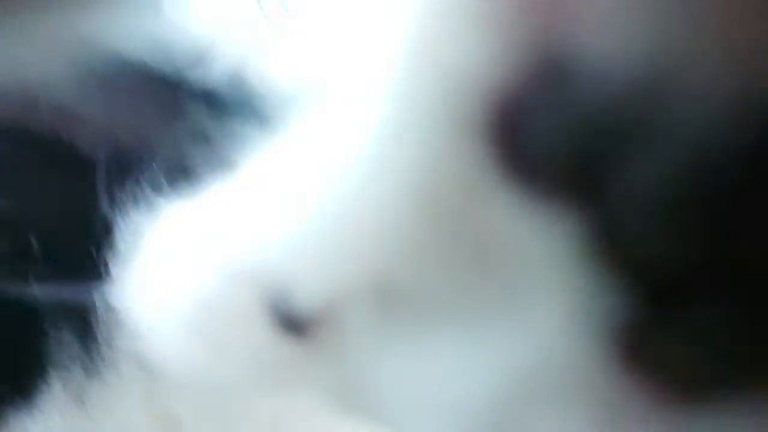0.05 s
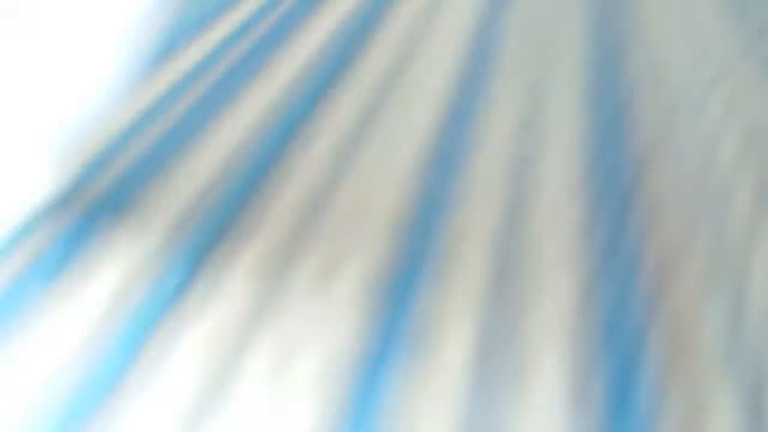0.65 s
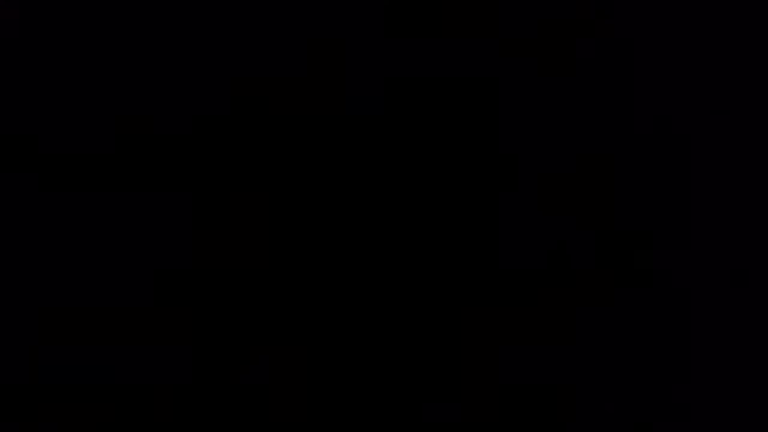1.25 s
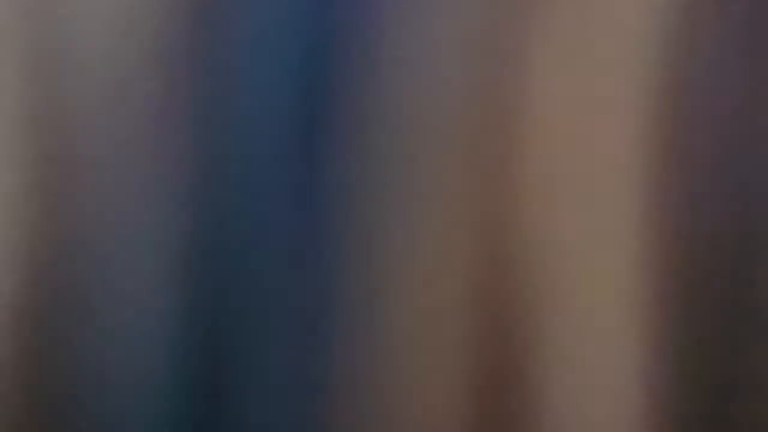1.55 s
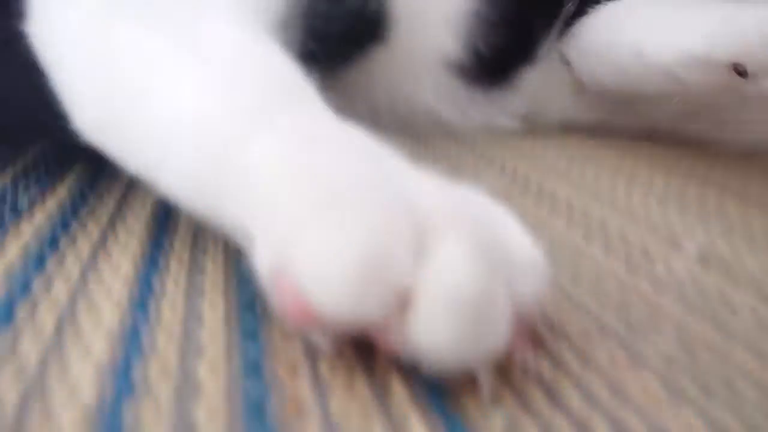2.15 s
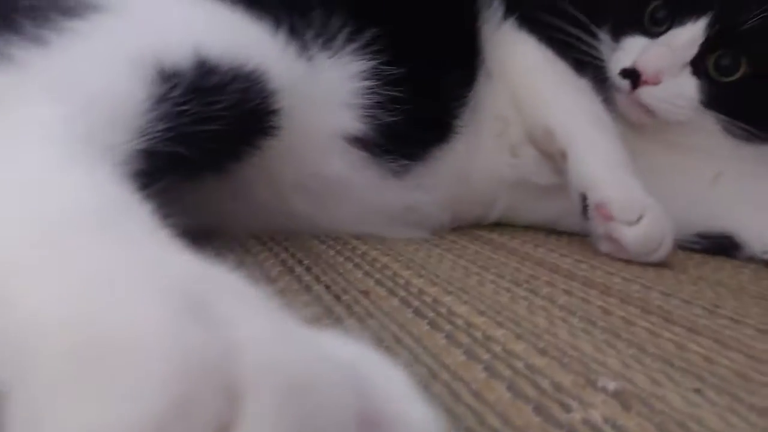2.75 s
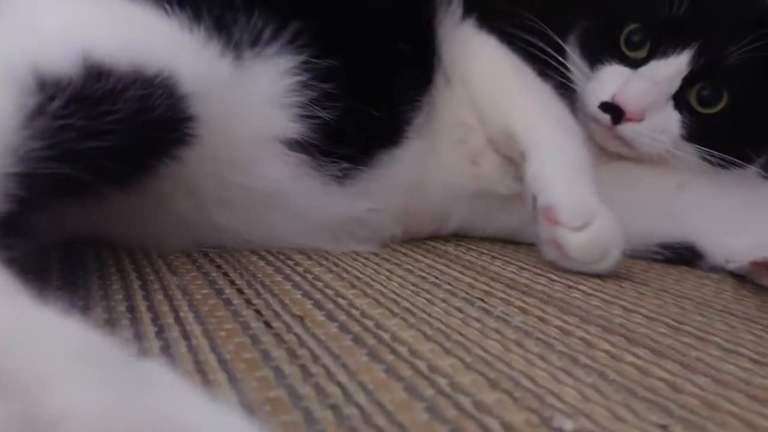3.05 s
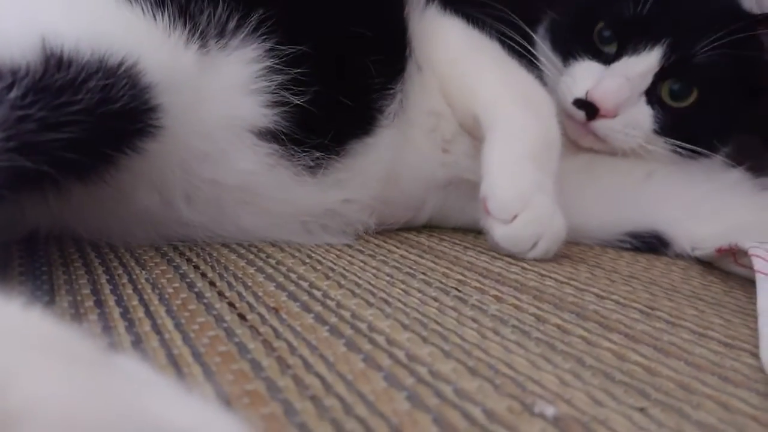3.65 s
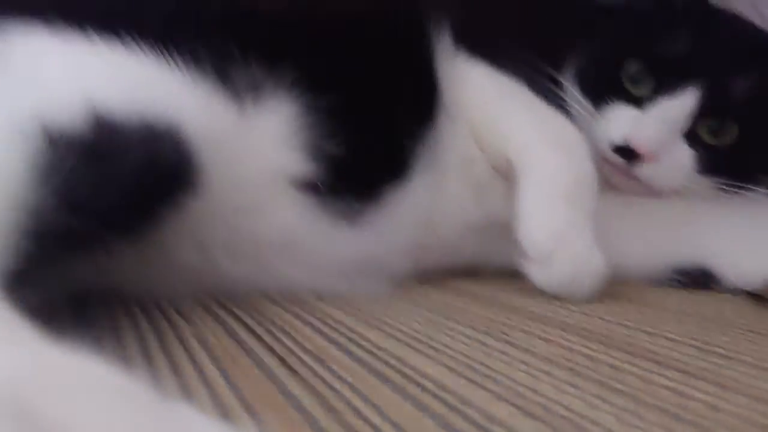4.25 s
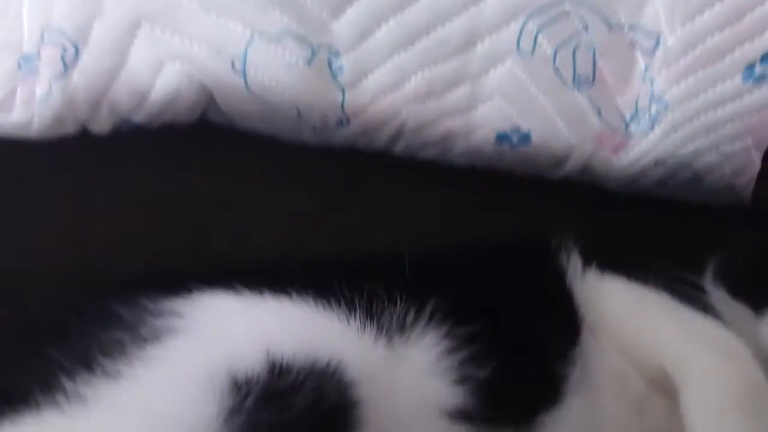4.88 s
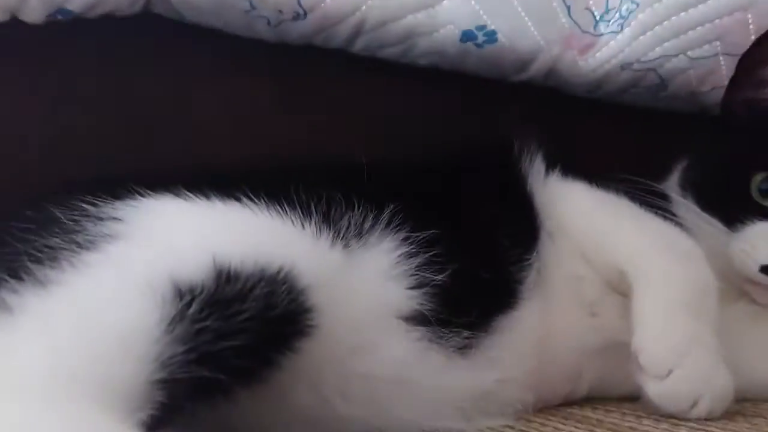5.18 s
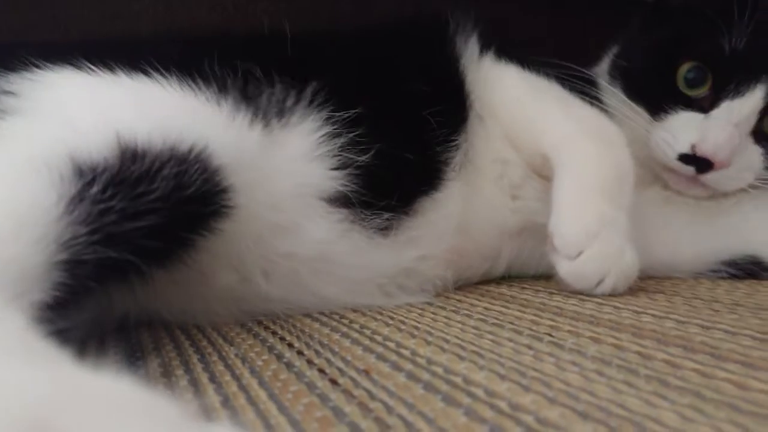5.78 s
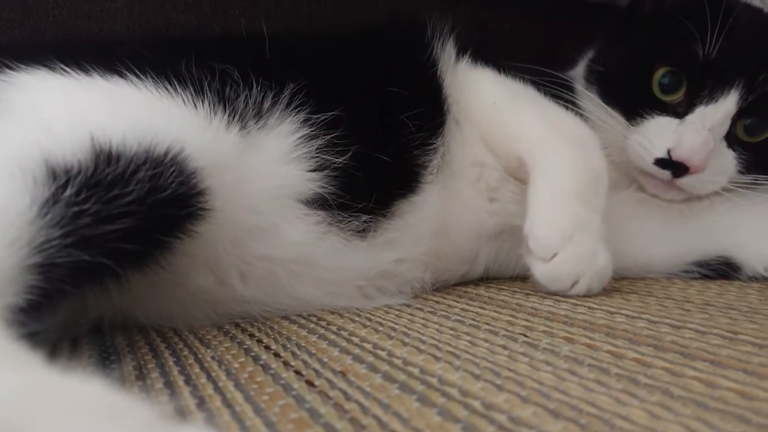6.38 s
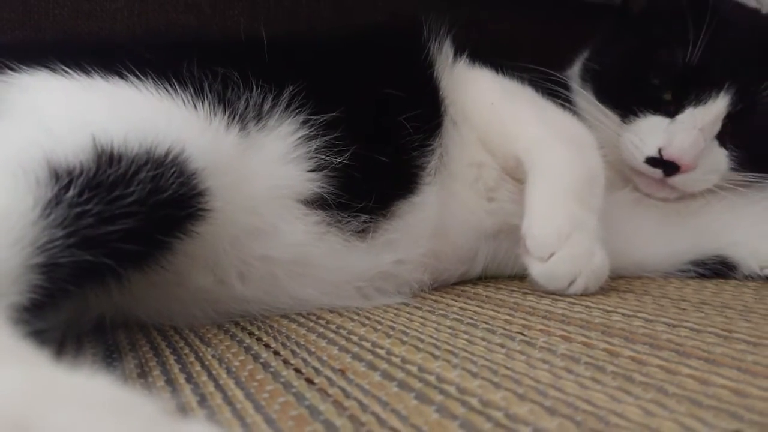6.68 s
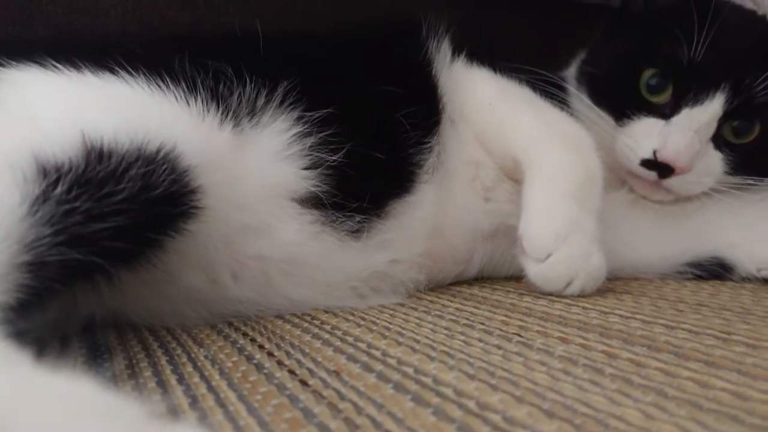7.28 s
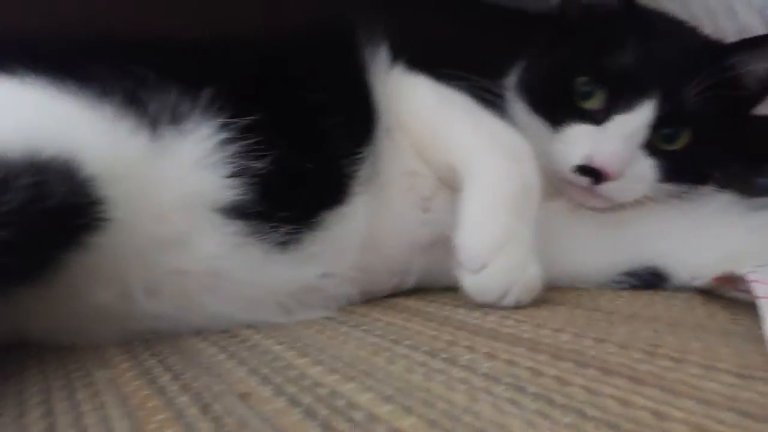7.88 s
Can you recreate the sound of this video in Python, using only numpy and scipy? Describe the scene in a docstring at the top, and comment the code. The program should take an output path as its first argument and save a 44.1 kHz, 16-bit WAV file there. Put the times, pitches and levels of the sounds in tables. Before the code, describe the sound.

Close fur rustling, scuffs and sharp clicks on a hand-held phone, thinning to occasional finger slides and dull taps over quiet room tone.

```python
"""A hand-held phone is pushed along a cat's fur, then held beside the cat in a quiet room.
At first, hairs and fingers stick and slip over its two microphone ports, each hearing its own rustle,
while the case is knocked, scuffed and bumped. After three seconds the rubbing sinks and single hairs
tick past. A second flurry of knocks and hollow finger slides comes between four and six seconds.
Then only the grip shifts now and then over the room tone, ending in a cluster of dull taps."""
import sys
import numpy as np
from scipy import signal
from scipy.fft import rfft, irfft
from scipy.io import wavfile
from scipy.ndimage import uniform_filter1d

SR = 44100
rng = np.random.default_rng(int(sys.argv[2]) if len(sys.argv) > 2 else 0)


def unload_audio(sound):
    """Save the sound as a 16-bit wav file, at the path given as the first command line argument."""
    columns = np.transpose(np.atleast_2d(sound))
    # keep every value between -1 and 1, then stretch to whole-number steps
    steps = np.round(np.clip(columns, -1, 1) * 32767)
    wavfile.write(sys.argv[1], SR, steps.astype(np.int16))


N = 349438
TIME = np.arange(N) / SR
BLOW_S = .008  # the level of a knock or tap is its rms over this time

# The bed of room tone and microphone hiss at each port. Each row: frequency in Hz, relative level in dB.
ROOM_TONE_LEFT = [(20, -24.5), (70, 4.5), (330, -3.5), (620, 4.5), (900, -7), (1150, -4.5), (1800, -26),
                  (4000, -41.5), (8500, -53), (10500, -24), (16000, -34)]
ROOM_TONE_RIGHT = [(20, -21), (70, 2.5), (200, 6.5), (500, -8), (950, -19.5), (1500, -29.5), (4000, -35),
                   (8800, -65.5), (10500, -34), (16000, -27.5)]
# Level of that bed in dB: left, then right.
ROOM_LEVEL_DB = [-56.5, -58]
# How the case and each port colour a touch. Each row: frequency in Hz, gain in dB.
PORT_COLOUR_LEFT = [(100, -6.5), (280, 5), (620, 4.5), (950, 1.5), (1600, 3), (2500, -2), (3900, -6),
                    (6400, -16.5), (7700, -38.5), (9100, -38), (10000, -23.5), (16000, -31.5)]
PORT_COLOUR_RIGHT = [(100, 0.5), (280, 2), (500, -2), (1200, 1), (2000, -4), (4000, -8), (6000, -9),
                     (8200, -19.5), (9100, -24.5), (10400, -11.5), (16000, -22.5)]
# The low pressure rumble of handling. Each row: frequency in Hz, gain in dB.
RUMBLE_COLOUR = [(20, -36), (48, 1), (72, 0), (150, -7.5), (250, -18.5), (600, -30.5), (2000, -71.5)]
# How the case answers a soft fingertip. Each row: frequency in Hz, gain in dB.
TAP_COLOUR = [(40, -2.5), (130, 5), (300, 0), (550, -8), (850, -28), (2000, -50)]
# Dull finger taps as the grip changes. Each row: start in seconds, left and right level in dB.
FINGER_TAPS = [(2.3322, -44, -32.5), (4.244, -41, -49), (4.385, -42, -48.5), (6.8892, -53, -42),
               (7.6617, -46.5, -39.5), (7.7396, -39, -35.5), (7.76, -41, -33), (7.824, -38.5, -33.5),
               (7.855, -41, -35.5)]
# Soft bumps that press air into the ports. Each row: middle and half-length in seconds,
# left and right level in dB.
AIR_BUMPS = [(0.273, 0.051, -44, -36.5), (0.746, 0.05, -47, -30.5), (0.8, 0.053, -23, -52),
             (1.115, 0.02, -14, -18), (1.189, 0.041, -31, -27.5), (1.258, 0.04, -34, -37),
             (1.577, 0.035, -47, -24.5), (3.183, 0.022, -36, -43), (3.241, 0.013, -33.5, -48),
             (4.285, 0.013, -34.5, -38.5), (4.431, 0.029, -42, -45), (4.56, 0.016, -35, -37)]
# Single hairs flicking past a port. Each row: start in seconds, level before trim in dB,
# left minus right in dB.
HAIR_FLICKS = [(1.2373, -39.5, 8), (1.3073, -52, 1), (1.337, -51, -5), (2.209, -45, 10), (3.738, -48, -1),
               (3.81, -46, 1), (3.877, -51, -2), (3.9149, -44, 0), (3.945, -53.5, 0.5), (4.06, -59.5, 2),
               (4.128, -56, 1), (4.2415, -51.5, 2), (4.275, -53, 2), (4.3653, -50.5, 1.5),
               (4.413, -46.5, -9), (7.209, -42, -2), (7.352, -55, -13)]
# Short scuffs across the ports. Each row: middle and half-length in seconds, left and right level in dB,
# ring in Hz, brightness in dB per octave.
PORT_SCUFFS = [(0.175, 0.013, -31.5, -57, 1010, 0), (0.194, 0.017, -25, -45, 1120, 1.5),
               (0.219, 0.02, -36.5, -51, 1130, -6), (0.251, 0.018, -35.5, -54, 630, -3.5),
               (0.417, 0.012, -33.5, -47, 2850, 5.5), (0.734, 0.01, -32.5, -55, 490, -3),
               (0.812, 0.025, -35.5, -27.5, 295, 1), (0.907, 0.013, -40, -21.5, 497, -0.5),
               (1.091, 0.0024, -32, -32, 12100, 5.5), (1.109, 0.01, -17.5, -44, 300, -1),
               (1.169, 0.01, -45, -29, 704, -1.5), (1.184, 0.0087, -31.5, -34.5, 600, 0.5),
               (1.235, 0.013, -40, -31.5, 477, -3), (1.264, 0.013, -40.5, -32, 670, -5),
               (1.399, 0.014, -37, -33, 420, -1), (1.421, 0.026, -29.5, -31, 720, -0.5),
               (1.613, 0.02, -47, -31, 3030, -2), (2.078, 0.012, -39.5, -56, 2700, 0.5),
               (2.232, 0.011, -42, -56, 2700, 4), (2.387, 0.016, -44, -56, 2600, 0.5),
               (2.467, 0.014, -45, -59, 2510, 0), (2.531, 0.019, -41, -61, 2800, 0.5),
               (3.1, 0.018, -38, -65, 5600, 5), (4.549, 0.021, -36.5, -34, 570, -2),
               (4.86, 0.023, -45.5, -54, 1390, 0), (5.323, 0.018, -43, -45, 1900, 3),
               (7.907, 0.0083, -40.5, -37.5, 560, 1)]
# Longer strokes of a finger or the coat. Each row: start and end in seconds, left and right level in dB,
# first and last ring in Hz, ring boost in dB, brightness in dB per octave, swell in dB.
SLIDING_STROKES = [(0.418, 0.665, -49, -64, 760, 620, 18, -4, -6),
                   (0.41, 0.611, -44.5, -72, 2870, 3050, 18, 5, -1),
                   (0.735, 0.856, -55, -42, 6000, 4800, 2, 2.5, -2),
                   (2.137, 2.267, -55, -67, 1800, 1850, 28, 6, 16),
                   (2.275, 2.341, -43, -58, 2500, 3700, 13, 2, 5),
                   (2.299, 2.736, -56, -66.5, 417, 475, 5, -6.5, 23),
                   (3.061, 3.189, -39.5, -85, 4460, 3800, 0.5, 8.5, 4),
                   (3.56, 3.732, -64, -68, 3750, 3950, 15, 4, 2),
                   (4.417, 4.478, -56, -48, 1300, 1800, 5, 3.5, 12),
                   (4.721, 4.807, -73, -51.5, 10880, 11500, 8, 1, -4),
                   (5.199, 5.366, -45.5, -47, 1150, 1800, 9, 2, 4),
                   (5.5, 5.59, -44, -46.5, 1300, 1800, 12, 3, 10),
                   (5.571, 5.656, -46.5, -49, 1300, 910, 15, 1.5, -18),
                   (5.813, 5.916, -52.5, -53.5, 1070, 1300, 12, -2, -17),
                   (5.878, 6.071, -53, -54, 1120, 1490, 11, 1.5, 19),
                   (6.856, 6.943, -57.5, -42, 2000, 3100, 8, 0.5, 24),
                   (7.099, 7.131, -62, -43.5, 1300, 1700, 5.5, 0, 7),
                   (7.155, 7.25, -57, -40.5, 1100, 2600, 6.5, 1, -30),
                   (7.68, 7.8, -56, -66, 3700, 3950, 18, 2.5, 0)]
# Sharp knocks on the case. Each row: start in seconds, left and right level in dB, ring in Hz,
# ring boost in dB, brightness in dB per octave, thud against the click in dB.
CASE_KNOCKS = [(0.0702, -27, -49, 1570, 9, 2.5, -36), (0.2303, -29.5, -70, 1180, 14.5, 4, -17),
               (0.2402, -25.5, -40, 1360, 13.5, -1, -31), (0.3697, -11.5, -19.5, 490, 7.5, 0.3, -16.5),
               (0.6726, -31.5, -30, 10600, 23, 0.5, -30), (0.673, -11.5, -20, 2450, 8, -2, -16),
               (0.806, -24, -40, 450, 1, -3.5, -8), (1.107, -13, -37, 1220, 17.5, 4, -3),
               (1.109, -24, -52, 12500, 15, 1.5, -20), (1.115, -45, -22, 770, 16, -1.5, -3),
               (1.1265, -50, -30, 3000, 16, -1.5, -3), (1.1807, -33.5, -48, 14200, 13, 7, -12),
               (1.2281, -44, -29.5, 493, 12.5, -3, -11), (1.2625, -35, -60, 680, 13.5, 0, -18),
               (1.607, -33.5, -36, 3200, 19, -2.5, -22), (1.816, -39, -30, 1430, 12.5, -1, -35),
               (1.846, -42, -36, 492, 1, -3, -27), (2.1294, -37.5, -20, 1690, 7, -1.5, -7.5),
               (4.4712, -36, -27, 940, 14, -5, -8), (4.4954, -22.5, -25.5, 1050, 11, -2, -13),
               (4.5553, -34, -50, 12300, 4, 13, -13), (5.1426, -42, -51, 2420, 16, 1, -16),
               (5.4928, -38, -49, 1246, 4.5, 0, -11.5), (6.744, -51, -55, 690, 10.5, 1.5, -12.5),
               (7.1551, -46, -42.5, 680, 9, -2, -0.5), (7.8612, -56, -31, 3240, 14, 0.5, -2),
               (7.8992, -53, -33.5, 584, 14, -10, -5)]
# Passes of the coat or a finger over the ports. Each row: start and length in seconds, left and right
# level at mid-pass in dB, hair hiss against the drag before trim in dB, swell in dB.
RUB_PASSES = [(0.0, 0.02, -48.5, -60, 3, 2), (0.165, 0.17, -53, -60.5, -1.5, -5),
              (0.374, 0.18, -47, -55, 4.5, -3.5), (0.577, 0.083, -54.5, -62.5, 4.5, 0),
              (0.703, 0.11, -42.5, -51, 0.5, 0.5), (0.841, 0.16, -51, -45.5, 3.5, -1),
              (1.051, 0.035, -42.5, -43.5, -3, 4), (1.105, 0.26, -51.5, -58, -4.5, -4.5),
              (1.409, 0.13, -52, -54.5, 0, -10), (1.577, 0.13, -56.5, -44, -1.5, -9),
              (1.734, 0.078, -43.5, -47, 1, -0.5), (1.843, 0.32, -48, -52.5, 1, -1),
              (2.094, 0.33, -50.5, -55, -1, -8), (2.47, 0.225, -47.5, -61, -3.5, 0.5),
              (2.729, 0.15, -66.5, -67.5, -6.5, 1), (2.892, 0.25, -46, -64.5, 0.5, 4.5),
              (3.239, 0.071, -58.5, -74.5, 1, -7), (3.556, 0.285, -63, -61.5, 0, 6.5),
              (3.903, 0.13, -67, -65.5, -4.5, -4), (4.14, 0.15, -64.5, -68, -3, 6),
              (4.464, 0.083, -47.5, -42.5, 0.5, 3.5), (4.601, 0.1, -44, -46, -1, 3.5),
              (4.725, 0.16, -51.5, -56, -3, -1.5), (4.925, 0.36, -51, -66.5, -5.5, 4),
              (5.216, 0.15, -53, -57, -9, 7.5), (5.52, 0.12, -56.5, -58.5, -12, 2.5),
              (6.53, 0.42, -69.5, -67.5, 1.5, 8.5), (6.962, 0.64, -67.5, -63, 0, 2.5),
              (7.687, 0.18, -55, -56.5, -2, -7)]
# Faint rubbing of the resting hand in dB: left, then right.
RESTING_GRIP_DB = [-76.5, -80]


def undb(db):
    """Decibels to gain."""
    return 10 ** (np.asarray(db) / 20)


def unit(x):
    """Scale to an rms of one."""
    return x / np.sqrt(np.mean(x ** 2))


def curve(points, hz):
    """Read a (Hz, dB) spectrum on a log-frequency axis."""
    f, db = np.transpose(points)
    return np.interp(np.log(hz), np.log(f), db)


def colour(x, db_at, size=4096):
    """Causal EQ with the gain db_at(Hz), built from its cepstrum."""
    hz = np.maximum(np.arange(size // 2 + 1) * SR / size, 1)
    cepstrum = irfft(np.log(undb(db_at(hz))))
    cepstrum[1:size // 2] *= 2
    cepstrum[size // 2 + 1:] = 0
    return signal.fftconvolve(x, irfft(np.exp(rfft(cepstrum))))


def walk(rate_hz):
    """A wandering modulator: random levels, held and smoothed twice, with an rms of one."""
    hold = int(SR / rate_hz)
    held = np.repeat(rng.standard_normal(N // hold + 1), hold)
    return unit(uniform_filter1d(uniform_filter1d(held, hold), hold)[:N])


def slips(n, rate_hz, spread_db, smooth):
    """Tiny stick-slip releases of uneven size over a share of smooth friction noise."""
    sizes = rng.choice([-1, 1], n) * undb(spread_db * np.clip(rng.standard_normal(n), -2, 2))
    releases = sizes * (rng.random(n) < rate_hz / SR)
    return unit(unit(releases + 1e-9) + smooth * rng.standard_normal(n))


def add(track, start, x):
    """Mix x into the track from a start time on."""
    i = max(int(start * SR), 0)
    track[i:i + len(x)] += x[:max(N - i, 0)]


def touch(force, port, ring_hz, tilt_db, ring_db, ring_octaves):
    """One contact heard through a port, at unit energy: the gap under the finger rings."""
    def gain_db(hz):
        octaves = np.log2(np.maximum(hz, 200) / ring_hz)
        resonance_db = ring_db / (1 + (octaves / ring_octaves) ** 2)
        bass_cut_db = -10 * np.log10(1 + (60 / hz) ** 2)
        return curve(port, hz) + tilt_db * octaves + resonance_db + bass_cut_db
    x = colour(force, gain_db)
    return x / np.sqrt(np.sum(x ** 2))


def room(shared=0.77):
    """A steady bed of room tone and hiss, partly common to both ports."""
    common = rng.standard_normal(N)
    bed = []
    for spectrum, db in zip((ROOM_TONE_LEFT, ROOM_TONE_RIGHT), ROOM_LEVEL_DB):
        noise = shared * common + rng.standard_normal(N)
        tone = colour(noise, lambda hz: curve(spectrum, hz))[:N]
        bed.append(unit(tone) * undb(db))
    return np.array(bed)


def taps(channel):
    """A fingertip lands on the case: one dull swing, a little higher or lower each time."""
    out = np.zeros(N)
    for start, *port_db in FINGER_TAPS:
        pitch = rng.uniform(0.87, 1.38)
        swing = colour(np.ones(1), lambda hz: curve(TAP_COLOUR, hz / pitch))
        add(out, start, swing * undb(port_db[channel]) * np.sqrt(BLOW_S * SR / np.sum(swing ** 2)))
    return out


def bumps(channel, lead_s=.004):
    """Soft pushes of air into a port: a few slow swings of pressure each."""
    out = np.zeros(N)
    for middle, half_s, *port_db in AIR_BUMPS:
        n = int(2 * half_s * SR)
        puff = rng.standard_normal(SR // 2)[:n] * np.hanning(n)
        push = colour(puff, lambda hz: curve(RUMBLE_COLOUR, hz))
        gain = undb(port_db[channel]) * np.sqrt(n / 2 / np.sum(push ** 2))
        add(out, middle - half_s - lead_s, gain * push)
    return out


def flicks(port, channel, trim_db=-1, decay_s=0.003):
    """A hair slips free: a thin tick of tiny slips that die at once, each hair with its own ring."""
    out, t = np.zeros(N), TIME[:SR // 32]
    for start, db, pan_db in HAIR_FLICKS:
        force = slips(len(t), rate_hz=2400, spread_db=1.2, smooth=0.65) * np.exp(-t / decay_s)
        gain = undb(db + trim_db + (pan_db, -pan_db)[channel] / 2) * np.sqrt(decay_s * SR)
        ring_hz = 3600 * rng.uniform(0.86, 1.2)
        add(out, start, gain * touch(force, port, ring_hz, tilt_db=1.0, ring_db=5.0, ring_octaves=0.27))
    return out


def scuffs(port, channel):
    """A burst of slips swells and fades as something jerks over the port."""
    out = np.zeros(N)
    for middle, half_s, *port_db, ring_hz, tilt_db in PORT_SCUFFS:
        n = int(2 * half_s * SR)
        force = slips(SR // 2, rate_hz=2400, spread_db=7.5, smooth=0.77)[:n] * np.hanning(n)
        scuff = touch(force, port, ring_hz, tilt_db, ring_db=14.5, ring_octaves=0.96)
        add(out, middle - half_s, scuff * undb(port_db[channel]) * np.sqrt(n / 2))
    return out


def strokes(port, channel, lead_s=.012, trail_s=0.0051, grit_db=2.2, stages=5):
    """A gritty slide eases in and lifts off; its hollow ring glides as the gap at the port changes."""
    out = np.zeros(N)
    grit = undb(grit_db * walk(rate_hz=260))  # the slide catches and lets go
    for start, end, *port_db, first_hz, last_hz, ring_db, tilt_db, swell_db in SLIDING_STROKES:
        n = int((end - start + lead_s + trail_s) * SR)
        progress = np.linspace(0, 1, n)
        contact = np.clip(np.minimum(progress / 0.37, (1 - progress) / 0.25), 0, 1)  # fade in and out
        pressure = np.sin(contact * np.pi / 2) ** 2 * undb(swell_db * progress) * grit[int(start * SR):][:n]
        # the glide is an equal-power crossfade through a row of rings
        for k, ring_hz in enumerate(np.geomspace(first_hz, last_hz, stages)):
            crossfade = np.sqrt(np.maximum(1 - np.abs(progress * (stages - 1) - k), 0))
            envelope = pressure * crossfade
            gain = undb(port_db[channel]) * np.sqrt(np.sum(envelope ** 2) / np.mean(pressure ** 2))
            force = slips(SR // 2, rate_hz=4000, spread_db=8.8, smooth=1.0)[:n] * envelope
            slide = touch(force, port, ring_hz, tilt_db, ring_db, ring_octaves=0.33)
            add(out, start - lead_s, gain * slide)
    return out


def knocks(port, channel, thud_hz, rattle_s=0.0022, thud_s=0.0068, dispersion=.7):
    """A sharp push and a brief rattle ring the case; a low thud swings out under them."""
    out, t = np.zeros(N), TIME[:SR // 16]
    thud = np.sin(2 * np.pi * thud_hz * t) * np.exp(-t / thud_s)
    thud /= np.sqrt(np.sum(thud ** 2))
    for start, *port_db, ring_hz, ring_db, tilt_db, thud_db in CASE_KNOCKS:
        force = .05 * rng.standard_normal(len(t)) * np.exp(-t / rattle_s)
        force[0] -= 1  # the push
        # the case springs back against the finger a moment later, which hollows the click
        rebound_s = rng.uniform(.0003, .00044)
        force += .42 * np.sinc((t - rebound_s) * SR / 4) / 4
        gain = undb(port_db[channel]) * np.sqrt(BLOW_S * SR)
        add(out, start, gain * touch(force, port, ring_hz, tilt_db, ring_db, ring_octaves=0.44))
        add(out, start, gain * undb(thud_db) * thud)
    # bending waves in the case bring the treble a little ahead of the bass
    for _ in range(2):
        out = signal.lfilter([-dispersion, 1], [1, -dispersion], out)
    return out


def friction_levels(channel, attack_db_per_s=326.5, release_db_per_s=400):
    """Envelopes of drag and hair hiss in dB: each pass builds up, swells or eases, and dies away."""
    t = TIME[::32]
    drag_db = hiss_db = np.full(len(t), RESTING_GRIP_DB[channel])
    for start, length, *port_db, hair_db, swell_db in RUB_PASSES:
        attack_db = attack_db_per_s * np.maximum(start - t, 0)
        release_db = release_db_per_s * np.maximum(t - start - length, 0)
        progress = np.clip((t - start) / length, 0, 1)
        db = port_db[channel] + swell_db * (progress - .5) - attack_db - release_db
        drag_db, hiss_db = np.maximum(drag_db, db), np.maximum(hiss_db, db + hair_db)
    return np.interp(TIME, t, drag_db), np.interp(TIME, t, hiss_db)


def rubbing(port, channel, drag_ring_hz, drag_ring_db, hiss_ring_hz, hiss_ring_db,
            hiss_trim_db, hiss_tilt_db, rumble_db, spurt_db, uneven_db=2.0, split_hz=1870):
    """Fur over a port: coarse slips drag, the case rumbles along, and fine hairs hiss in spurts."""
    drag_db, hiss_db = friction_levels(channel) + uneven_db * walk(rate_hz=30)
    lowpass = signal.butter(4, split_hz, "low", fs=SR, output="sos")
    highpass = signal.butter(4, split_hz, "high", fs=SR, output="sos")
    coarse = signal.sosfilt(lowpass, slips(N, rate_hz=2500, spread_db=3.4, smooth=0.97))
    hairs = slips(N, rate_hz=6000, spread_db=4.3, smooth=1.0) * undb(spurt_db * walk(rate_hz=60))
    fine = signal.sosfilt(highpass, hairs)
    drag = unit(touch(coarse, port, drag_ring_hz, 0., drag_ring_db, ring_octaves=0.17)[:N])
    drag *= undb(drag_db + 0.49 * walk(rate_hz=70))
    hiss = unit(touch(fine, port, hiss_ring_hz, hiss_tilt_db, hiss_ring_db, ring_octaves=0.13)[:N])
    hiss *= undb(hiss_db + hiss_trim_db)
    rumble = unit(colour(rng.standard_normal(N), lambda hz: curve(RUMBLE_COLOUR, hz))[:N])
    return drag + hiss + rumble * undb(drag_db + rumble_db)


def scene():
    """Each port hears its own rubbing and its share of every touch, over the room tone."""
    left = rubbing(PORT_COLOUR_LEFT, channel=0, drag_ring_hz=1750, drag_ring_db=0.5,
                   hiss_ring_hz=3720, hiss_ring_db=4.0, hiss_trim_db=-1.5, hiss_tilt_db=3.5,
                   rumble_db=-4.5, spurt_db=2.0)
    right = rubbing(PORT_COLOUR_RIGHT, channel=1, drag_ring_hz=1200, drag_ring_db=0.0,
                    hiss_ring_hz=5600, hiss_ring_db=0.0, hiss_trim_db=-2.0, hiss_tilt_db=1.0,
                    rumble_db=-0.5, spurt_db=3.0)
    left += knocks(PORT_COLOUR_LEFT, channel=0, thud_hz=67.5)
    right += knocks(PORT_COLOUR_RIGHT, channel=1, thud_hz=77.6)
    mix = np.array([left, right])
    for channel, port in enumerate((PORT_COLOUR_LEFT, PORT_COLOUR_RIGHT)):
        mix[channel] += scuffs(port, channel) + strokes(port, channel) + flicks(port, channel)
        mix[channel] += taps(channel) + bumps(channel)
    return mix + room()


def record(dry, ceiling=.92, bottom_hz=43, top_hz=16200):
    """The phone rounds the loudest peaks, thins the deepest bass and cuts the top."""
    highpass = signal.butter(5, bottom_hz, "high", fs=SR, output="sos")
    lowpass = signal.ellip(10, .1, 80, top_hz, fs=SR, output="sos")
    rounded = ceiling * np.tanh(dry / ceiling)
    return signal.sosfilt(lowpass, signal.sosfilt(highpass, rounded))


dry = scene()
out = record(dry)
unload_audio(out)
```